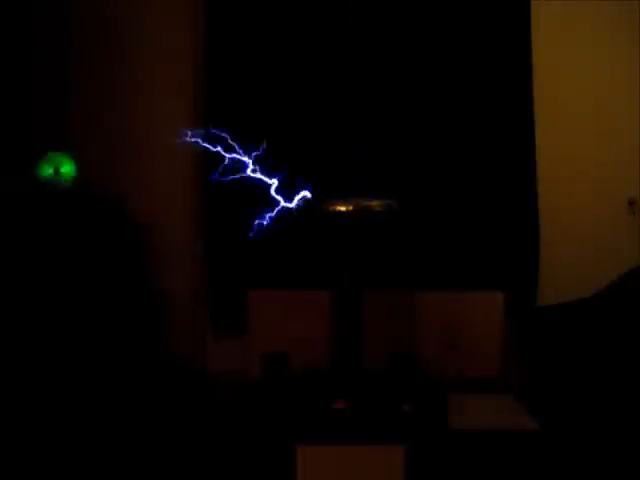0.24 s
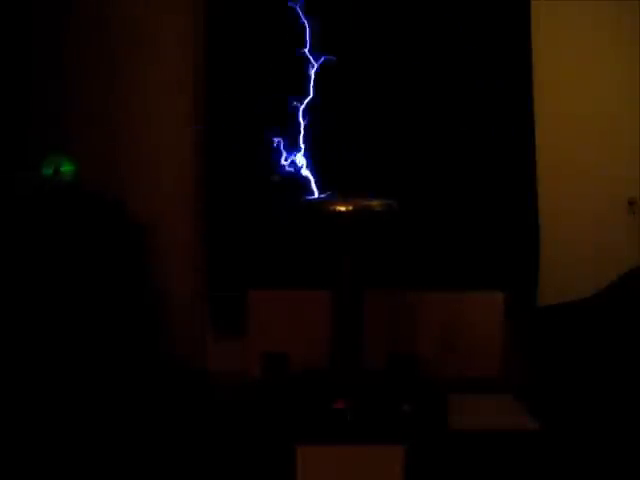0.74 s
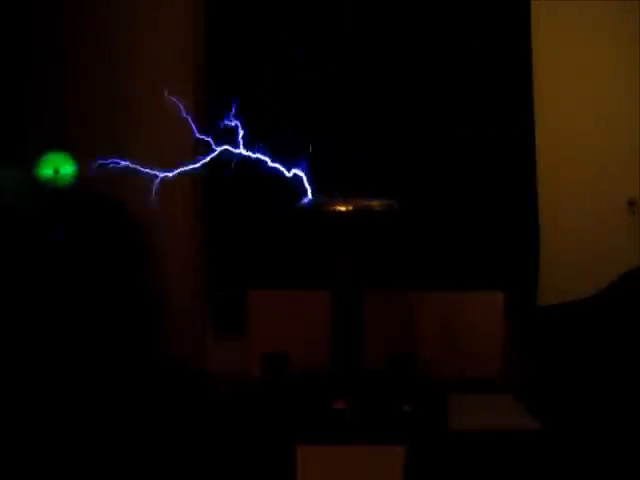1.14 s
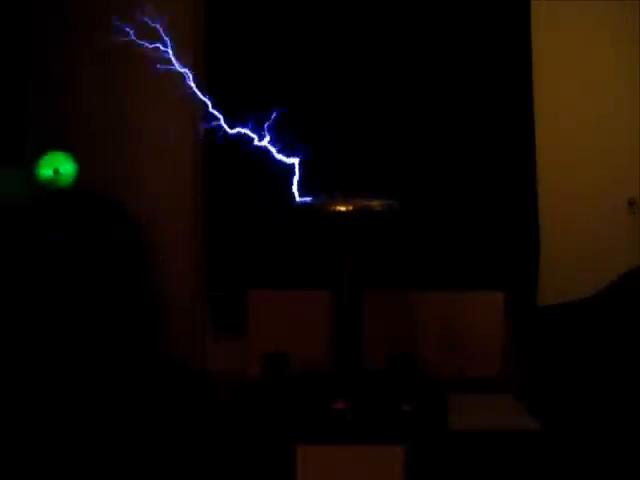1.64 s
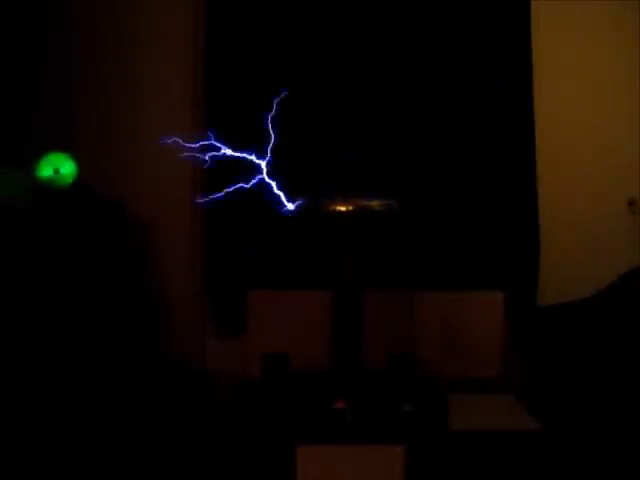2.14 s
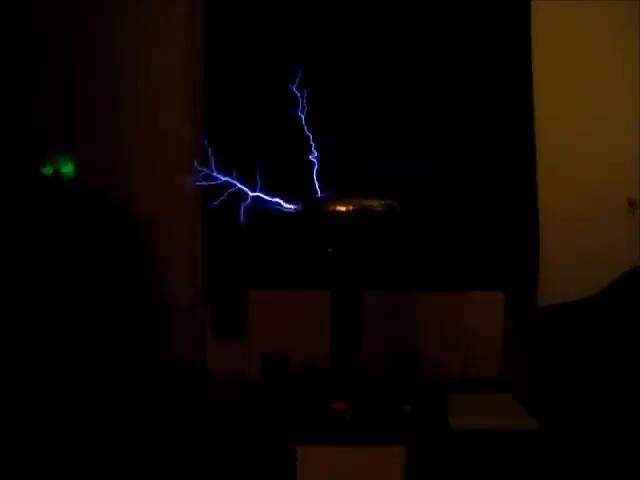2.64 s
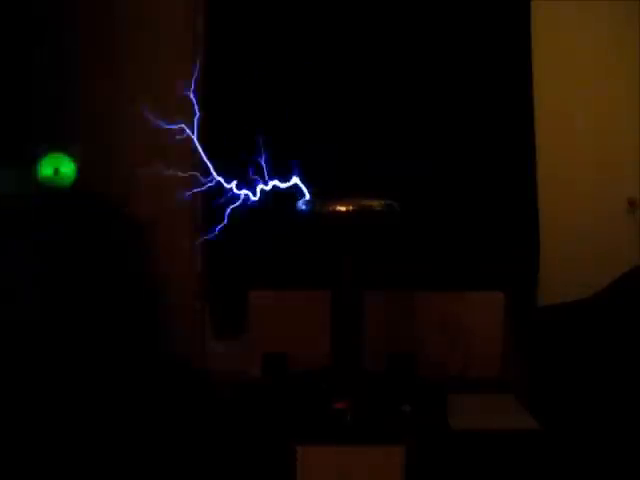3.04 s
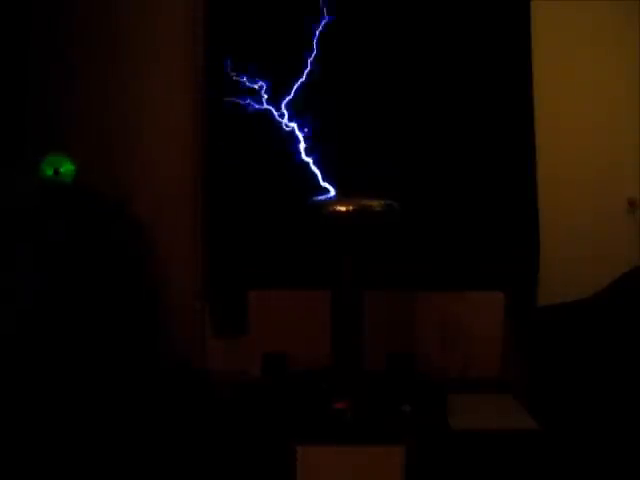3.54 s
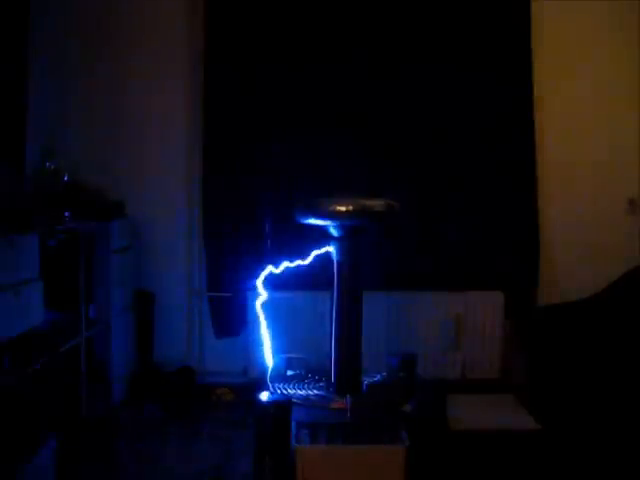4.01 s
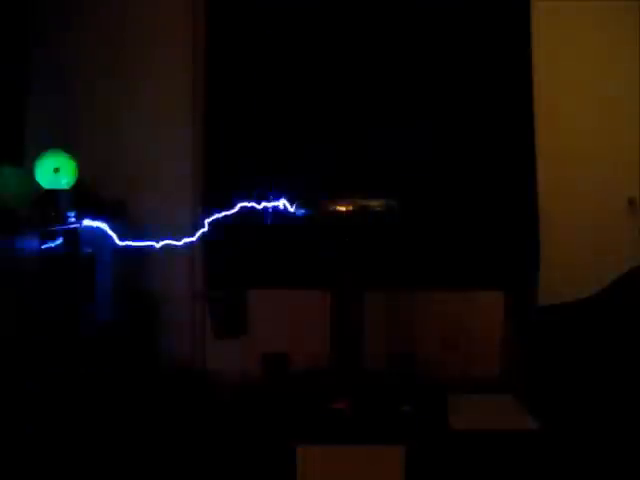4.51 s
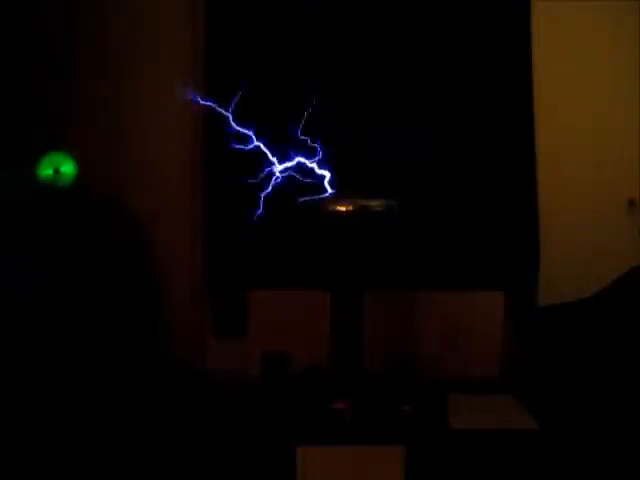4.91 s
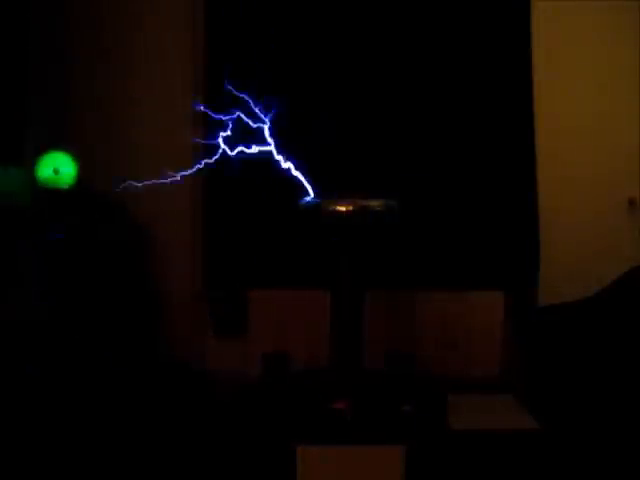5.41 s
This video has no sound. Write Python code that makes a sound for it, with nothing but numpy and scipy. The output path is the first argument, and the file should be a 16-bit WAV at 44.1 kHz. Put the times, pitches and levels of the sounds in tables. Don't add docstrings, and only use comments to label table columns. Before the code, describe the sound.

Loud, dense electric buzzing fills the whole stretch, already running at the start and still going at the end. The pitch dips a hair, climbs back by about 4.7 seconds, then eases down again. Sizzling treble and shifting whistly partials ride on it. Grounded arcs near 3 and 3.7 to 4.5 seconds sound tighter, with a few tiny clicks. Close indoor camera pickup, very short echo.

```python
import sys
import numpy as np
from scipy import signal
from scipy.fft import rfft, irfft
from scipy.io import wavfile
from scipy.ndimage import uniform_filter1d

SR = 44100
rng = np.random.default_rng(int(sys.argv[2]) if len(sys.argv) > 2 else 0)


def ratio_of_db(decibels):
    return 10 ** (np.asarray(decibels, float) / 20)


def pcm_store(signal):
    levels = np.round(np.clip(np.atleast_2d(signal), -1, 1) * 32767)
    wavfile.write(sys.argv[1], SR, levels.astype(np.int16).T)


N = 249591
TIME = np.arange(N) / SR
COARSE = 8
TOP_HZ = 15750
RIPPLE_HZ = 100.03


def unit(x):
    return x / np.sqrt(np.mean(np.abs(x) ** 2))


def curves(table):
    s, *columns = np.transpose(table)
    return [np.interp(TIME, s, c) for c in columns]


def on_log(hz, table):
    f, db = np.transpose(table)
    return np.interp(np.log(np.maximum(hz, 1)), np.log(f), db)


def fine(z):
    return np.interp(TIME, TIME[::COARSE], z)


def ripple_shape(turn, parts):
    return sum(depth * np.cos(n * 2 * np.pi * turn + lead) for n, (depth, lead) in enumerate(parts, 1))


# (start [s], end [s], grip [0-1])
STRIKES = [
    (2.887, 3.053, 0.63),
    (3.682, 4.19, 0.97),
    (4.204, 4.46, 0.61),
]


def grip():
    held = sum(g * (TIME >= a) * (TIME < b) for a, b, g in STRIKES)
    catch_s = 0.076
    return np.clip(uniform_filter1d(held, int(catch_s * SR) + 1), 0, 1)


def roam():
    held = sum(g * np.clip(TIME[::COARSE] - a, 0, b - a) for a, b, g in STRIKES)
    return TIME[::COARSE] - 0.6 * held


def wander(rate_hz, step=128):
    f = np.fft.fftfreq(N // step + 2, step / SR)
    draw = rng.standard_normal((2, len(f)))
    z = unit(np.fft.ifft((draw[0] + 1j * draw[1]) / (1 + (f / rate_hz) ** 2)))
    return np.interp(roam(), np.arange(len(f)) * step / SR, z)


def blooms(table, line_hz, reach_hz):
    t, gain = TIME[::COARSE], 0
    for s, hz, db, length in table:
        if abs(hz - line_hz) < reach_hz:
            gain = gain + ratio_of_db(db) * np.cos(np.pi / 2 * np.clip((t - s) / length, -1, 1)) ** 2
    return gain


SWELL = [
    (1.8, 0),
    (.41, 2.87),
]
# (depth [ms], lead [rad])
SLIP_MS = [
    (.061, -2.94),
    (.013, 2.22),
]
# (frequency [Hz], level [dB])
BUZZ = [(560, -43), (665, -46.5), (870, -42), (1530, -42), (2300, -38.5), (3800, -36.5), (5350, -36.5),
        (6900, -38.5), (9200, -42), (11000, -41), (13000, -38.5), (15000, -40)]
BETWEEN_DB = [-47, -43.5, -43, -43]
# (time [s], partial [Hz], peak level [dB], length [s])
BLOOMS = [(0.0, 2295, -45, 0.51), (0.01, 3060, -32, 0.085), (0.17, 1530, -37.5, 0.14),
          (0.22, 765, -45, 0.47), (0.756, 2295, -33, 0.11), (1.068, 3060, -37.5, 0.28),
          (1.185, 765, -43, 0.17), (1.32, 2295, -42.5, 0.2), (1.67, 1530, -43, 0.38),
          (1.773, 2295, -41, 0.083), (1.815, 3060, -37, 0.11), (2.13, 765, -51.5, 0.47),
          (2.22, 3060, -44, 0.15), (2.353, 1530, -43, 0.098), (2.758, 765, -46.3, 0.18),
          (3.11, 765, -43, 0.81), (3.11, 2295, -38.5, 0.2), (3.215, 3060, -43.2, 0.13),
          (3.527, 2295, -44, 0.14), (3.617, 3060, -41, 0.16), (4.429, 2295, -46, 0.71),
          (4.718, 765, -54, 0.61), (4.74, 3060, -35, 0.12), (4.81, 1530, -42, 0.13),
          (4.991, 1530, -42.5, 0.8), (5.116, 3060, -35, 0.077), (5.407, 765, -46, 0.34),
          (5.43, 3060, -42, 0.3)]
# (time [s], partial [Hz], cancelled share of amplitude [dB],
# length [s])
NULLS = [
    (0.76, 765, -2, 0.18),
    (1.82, 765, -6, .08),
    (5.08, 765, -2, 0.079),
    (0.44, 1530, -3, .08),
    (2.09, 1530, -3, .15),
    (4.98, 1530, -2, .06),
    (5.2, 1530, -2, .07),
    (2.75, 2295, -5, 0.17),
    (5.5, 2295, -7, .2),
    (1.42, 3060, -4, 0.14),
]
# (time [s], line [Hz], peak level [dB], length [s])
RIPPLE_BLOOMS = [(0.26, 868, -53.9, 0.28), (0.27, 4707, -38.8, 0.1), (0.29, 2203, -43.3, 0.07),
                 (0.44, 5475, -41.4, 0.2), (0.45, 3839, -45.6, 0.6), (0.54, 1436, -47.3, 0.1),
                 (0.6, 3171, -40.5, 0.2), (1.0, 668, -51.6, 0.2), (1.34, 1636, -45.4, 0.07),
                 (1.49, 868, -49.7, 0.07), (1.76, 2403, -41.4, 0.07), (1.8, 668, -54.1, 0.14),
                 (2.33, 868, -41.7, 0.1), (2.46, 1636, -46.2, 0.07), (2.56, 3939, -46.1, 0.6),
                 (2.62, 2971, -38.4, 0.07), (2.66, 1436, -49.9, 0.6), (2.77, 4507, -40.1, 0.14),
                 (2.92, 868, -50.6, 0.28), (3.08, 2403, -48.0, 0.4), (3.1, 1436, -48.3, 0.14),
                 (3.2, 2203, -43.2, 0.1), (3.34, 4607, -41.2, 0.2), (3.47, 3739, -43.2, 0.4),
                 (3.51, 668, -59.7, 0.6), (3.59, 1636, -45.4, 0.1), (4.41, 868, -48.3, 0.07),
                 (4.88, 2403, -41.1, 0.14), (5.18, 2403, -45.5, 0.2), (5.46, 1636, -50.5, 0.2)]


def buzz(turns, ripple, effort_db):
    grip_octave_db, grip_ripple_db = -5, -5
    bloom_boost_db, under_bloom_db = 3.5, -2.5
    out, held = np.zeros(N), grip()[::COARSE]
    cycle = np.arange(32) / 32
    spin = np.exp(2j * np.pi * ripple[::COARSE])
    clock = np.exp(2j * np.pi * turns)
    partial = np.ones(N)
    for k in range(1, 21):
        hz = k * RATE[0][1]
        slip = 2 * np.pi * hz * ripple_shape(cycle, SLIP_MS) / 1000
        modulation = np.exp(ripple_shape(cycle, SWELL) - 1j * slip)
        shares = unit(np.fft.fft(modulation)) * np.sqrt(32)
        quick_hz = 8.1 + 0.19 * k
        drift = np.exp(1.2j * np.sqrt(k) * wander(1.45).real)
        direct = ratio_of_db(-10.0 + 0.33 * k) * drift * np.abs(wander(0.37 * quick_hz))
        lines = 0
        for m in range(-5, 7):
            path = unit(direct + wander(quick_hz))
            phase = shares[m] / np.abs(shares[m])
            if m == 0 and k <= len(BETWEEN_DB):
                flicker = unit(1 + 0.58 * wander(15.0)) * phase
                steady = ratio_of_db(BETWEEN_DB[k - 1] + (k == 2) * grip_octave_db * held)
                standing = steady + blooms(BLOOMS, hz, hz / 10)
                lines = lines + standing * (1 - blooms(NULLS, hz, hz / 10)) * drift * flicker
            else:
                line_hz = hz + m * RIPPLE_HZ
                mean_db = on_log(line_hz, BUZZ) + effort_db[::COARSE] + (k == 2) * grip_ripple_db * held
                restless = ratio_of_db(mean_db) / len(cycle) * np.abs(shares[m])
                swell = ratio_of_db(bloom_boost_db) * blooms(RIPPLE_BLOOMS, line_hz, 10)
                yields = ratio_of_db(under_bloom_db * swell / (swell + restless))
                lines = lines + (restless * yields * path + swell * drift) * phase * spin ** m
        partial = partial * clock
        out += np.sqrt(2) * np.real(fine(lines) * partial)
    return out


def patchy(x, f, width_hz=420, patch_db=3.0, rate_hz=11.4):
    wave, out = rfft(x), 0
    for hz in np.arange(0, TOP_HZ + width_hz, width_hz):
        band = np.cos(np.pi / 2 * np.clip((f - hz) / width_hz, -1, 1)) ** 2
        out = out + ratio_of_db(patch_db * fine(wander(rate_hz).real)) * irfft(wave * band, N)
    return out


# (frequency [Hz], level per Hz [dB])
AIR = [(25, -44), (60, -29.5), (150, -29.5), (250, -26), (400, -22), (800, -15), (1500, -10), (2700, -6),
       (4200, -3), (6500, -1), (9500, 0.5), (13000, -1.5), (15500, 1)]


def crackle(turns, ripple, level_db, mid_db):
    bang_size = ratio_of_db(2.0 * rng.standard_normal(int(turns[-1]) + 1))[turns.astype(int)]
    swell = bang_size * np.exp(0.69 * ripple_shape(ripple, SWELL))
    lopsided_noise = rng.uniform(-1.22, 1, N) + 0.26
    burst = unit(swell * np.exp(-(turns % 1) / 0.21) * lopsided_noise)
    echo = np.exp(-TIME[:SR // 10] / 0.012)
    wash = np.sqrt(np.abs(signal.fftconvolve(swell ** 2, echo)[:N]))
    wash = unit(wash * rng.standard_normal(N))
    direct = np.clip(0.12 + 0.22 * grip() + 0.067 * fine(wander(12.0).real), 0, .9)
    heard = np.sqrt(direct) * burst + np.sqrt(1 - direct) * wash

    f = np.fft.rfftfreq(N, 1 / SR)
    wave = rfft(patchy(heard, f)) * ratio_of_db(on_log(f, AIR))
    high = 1 / (1 + (7800 / np.maximum(f, 1)) ** 8)
    low = 1 / (1 + (f / 1500) ** 4)
    scale = 1 / np.std(irfft(wave * high * (f < TOP_HZ), N))
    shares = (high, (1 - high) * (1 - low), (1 - high) * low)
    treble, middle, bass = [irfft(wave * share, N) * scale for share in shares]
    mean_db = np.mean(level_db)
    bass_db = mean_db + 0.65 * (level_db - mean_db) + 0.24 * mid_db
    return ratio_of_db(level_db) * (treble + ratio_of_db(0.96 * mid_db) * middle) + ratio_of_db(bass_db) * bass


HUM_DB = [-89, -74, -72, -69]


def hum(ripple):
    out = 0
    for k, db in enumerate(HUM_DB, 1):
        unsteady = fine(unit(1 + wander(3.6)))
        out = out + ratio_of_db(db) * np.real(unsteady * np.exp(2j * np.pi * k * ripple))
    return out


# (time [s], level [dB])
SLIPS = [
    (.08, -29),
    (.933, -23),
]


def slips():
    side = np.zeros(N)
    fade = np.sin(np.pi * np.arange(2048) / 2048) ** 2
    for s, db in SLIPS:
        i = int(s * SR) - len(fade) // 2
        side[i:i + len(fade)] = ratio_of_db(db) * fade * rng.standard_normal(len(fade))
    edges_hz = ((4700, 7300), (9500, 13400))
    bands = [signal.butter(6, edge, "band", fs=SR, output="sos") for edge in edges_hz]
    return sum(signal.sosfilt(band, side) for band in bands)


# (time [s], peak level [dB], decay [ms])
TICKS = [(2.9103, -28, 0.098), (2.9195, -34, 0.17), (2.938, -27, 0.096), (2.999, -33.5, 0.2),
         (3.6896, -28, 0.17), (3.7093, -32, 0.18), (3.7275, -11.5, 0.2), (3.8779, -11.5, 0.16),
         (3.9488, -17.5, 0.16), (4.109, -30, 0.13), (4.272, -36, 0.32), (4.31, -33, 0.2),
         (4.3487, -25, 0.2), (4.3498, -26, 0.16), (4.3684, -35.4, 0.2), (4.389, -15.5, 0.16),
         (4.4263, -13.5, 0.12)]


def ticks():
    out, t_ms = np.zeros(N), np.arange(-40, 260) / SR * 1000
    for s, db, decay_ms in TICKS:
        kick = np.exp(-np.logaddexp(-t_ms / .05, t_ms / max(decay_ms, .02)))
        i = int(s * SR) - 40
        out[i:i + len(t_ms)] += ratio_of_db(db) * kick / kick.max()
    lead = signal.butter(1, 8.6, "high", fs=SR, output="sos")
    return signal.sosfilt(lead, out)


# (time [s], bang rate [Hz])
RATE = [(0.0, 767.8), (0.75, 767.6), (1.05, 765.4), (1.35, 762.6), (1.65, 762.1), (2.25, 762.0),
        (2.55, 761.2), (3.15, 762.1), (3.45, 762.6), (4.65, 766.4), (4.95, 765.5), (5.25, 762.6),
        (5.66, 761.5)]
# (time [s], level [dB])
STRENGTH = [(0.0, -24.5), (1.29, -24), (1.72, -25.5), (1.75, -24.5), (2.14, -25), (2.16, -24.5),
            (2.77, -24.5), (3.03, -26), (3.18, -24), (4.3, -25.5), (4.43, -23), (4.49, -26.5),
            (4.76, -23.5), (5.03, -24.5), (5.09, -22.5), (5.19, -27), (5.36, -24.5), (5.66, -24.5)]


def scene():
    turns = np.cumsum(curves(RATE)[0]) / SR
    ripple = RIPPLE_HZ * TIME - 0.13
    strength_db, held = curves(STRENGTH)[0], grip()
    fork_db = 0.57 * fine(wander(9.4).real)
    level_db = strength_db - 3.5 + 1.8 * held + fork_db
    mid_db = -4 * (held - held.mean()) - 1.6 * fork_db
    effort_db = 1.17 * (strength_db - strength_db.mean()) + 0.54 * mid_db
    mono = buzz(turns, ripple, effort_db) + crackle(turns, ripple, level_db, mid_db)
    mono = mono + ticks() + hum(ripple)
    return np.array([mono, mono])


def band_limit(x):
    return signal.sosfilt(signal.butter(12, 17080, fs=SR, output="sos"), x)


def record(dry):
    x = dry + slips() * np.array([[1], [-1]])
    x = np.tanh(1.3 * x) / 1.3
    for sharpness, depth in ((3.6, 0.82), (25, 0.94)):
        x = x - depth * signal.lfilter(*signal.iirpeak(7878, sharpness, SR), x)
    x = signal.sosfiltfilt(signal.ellip(14, .1, 50, TOP_HZ, fs=SR, output="sos"), x)
    return band_limit(x)


dry = scene()
out = record(dry)
pcm_store(out)
```